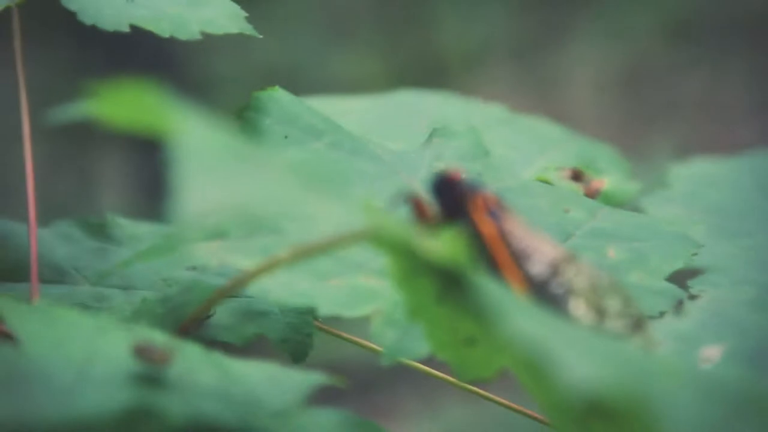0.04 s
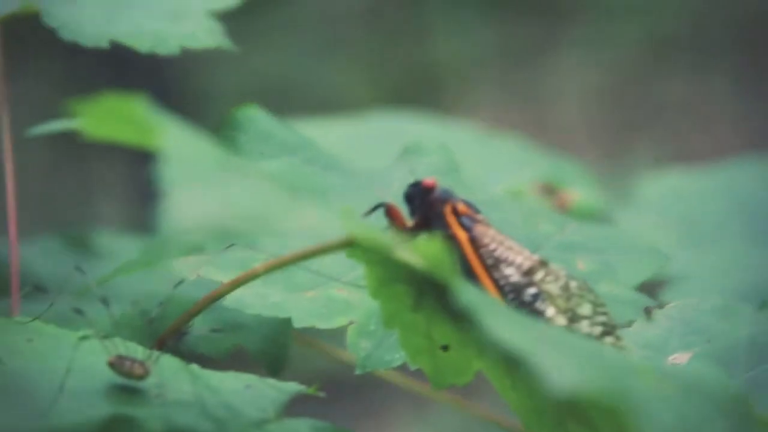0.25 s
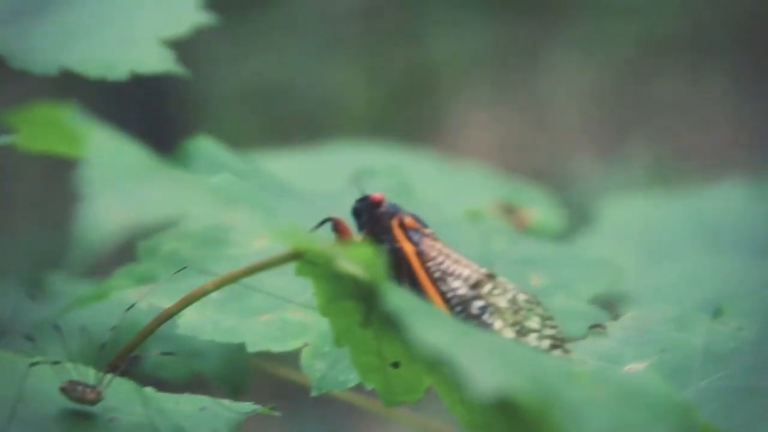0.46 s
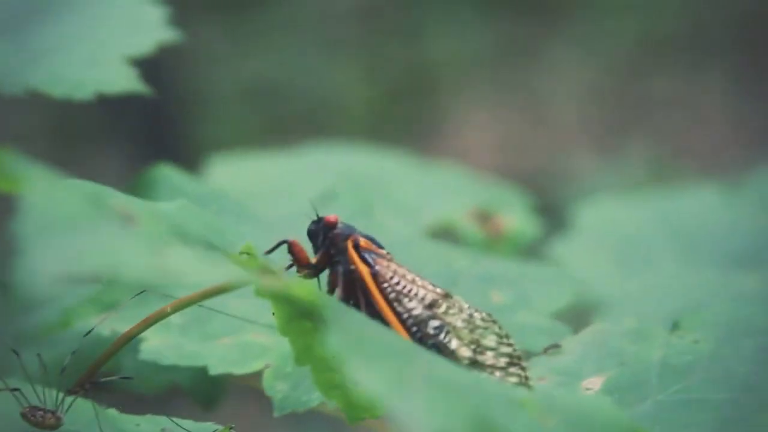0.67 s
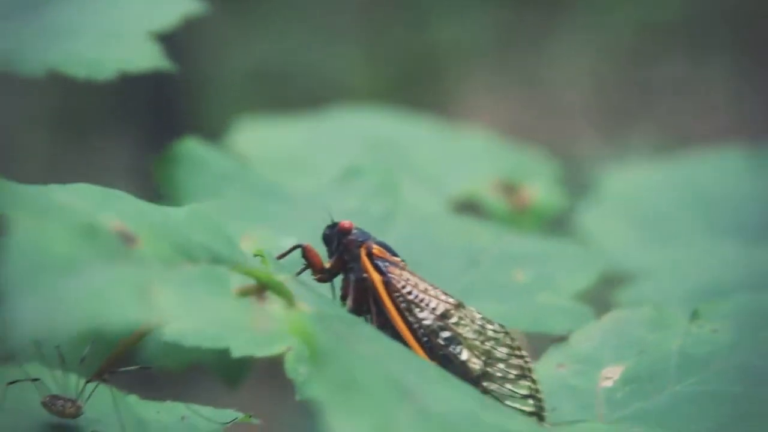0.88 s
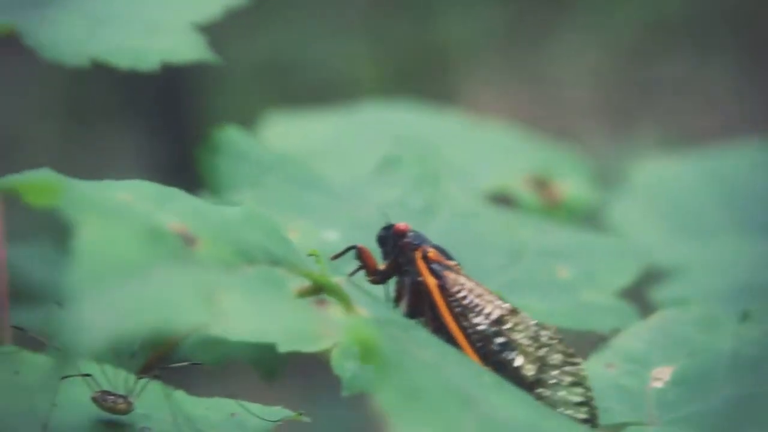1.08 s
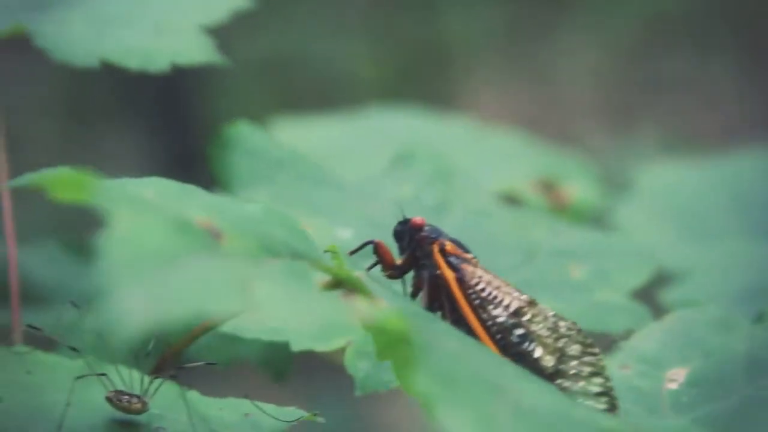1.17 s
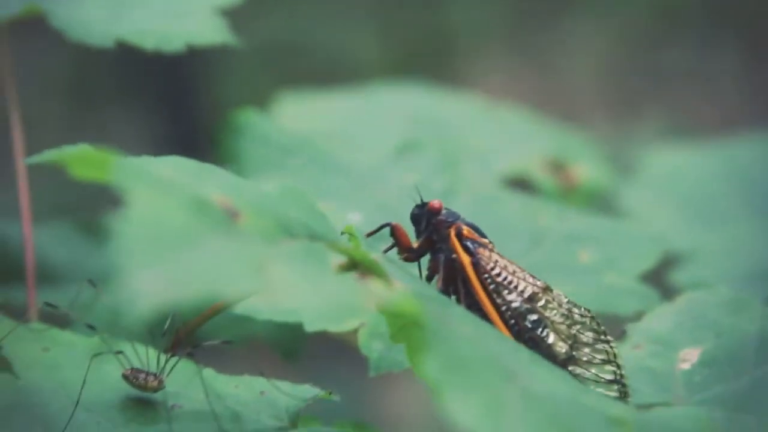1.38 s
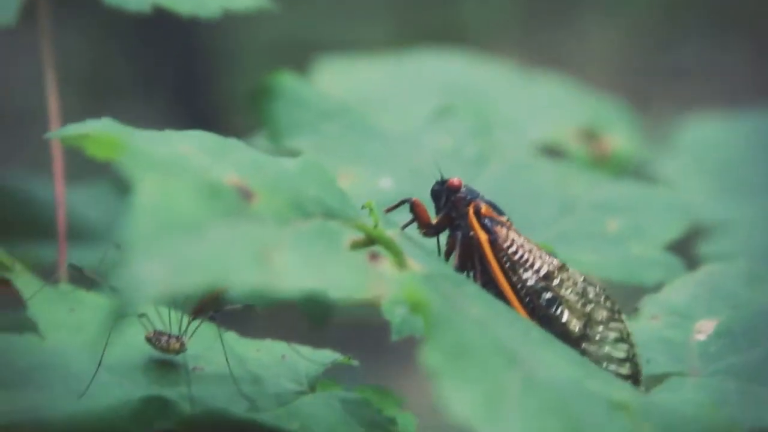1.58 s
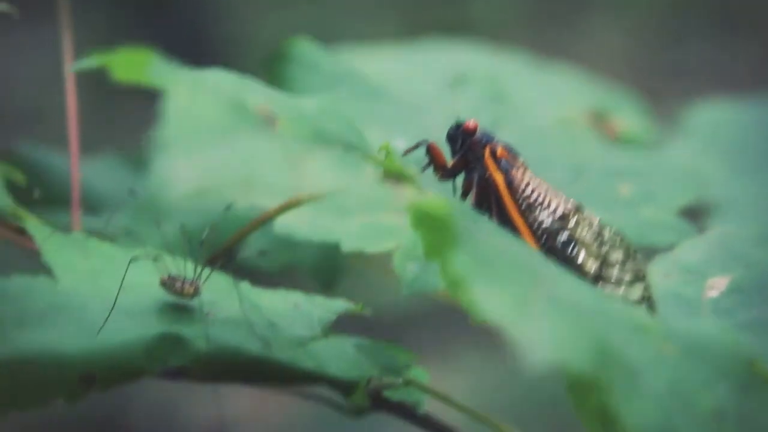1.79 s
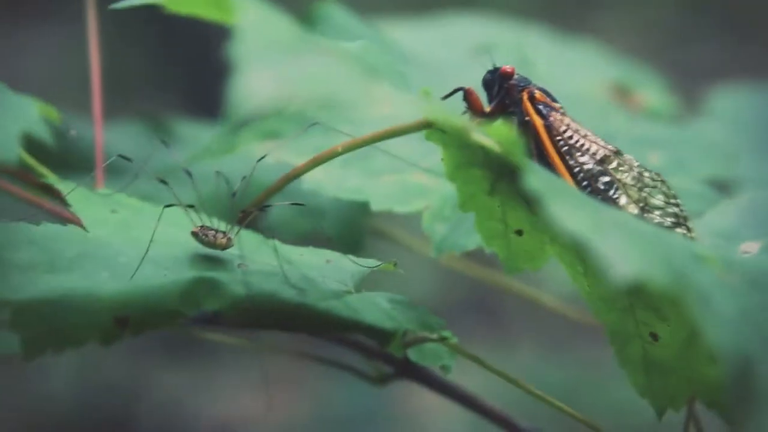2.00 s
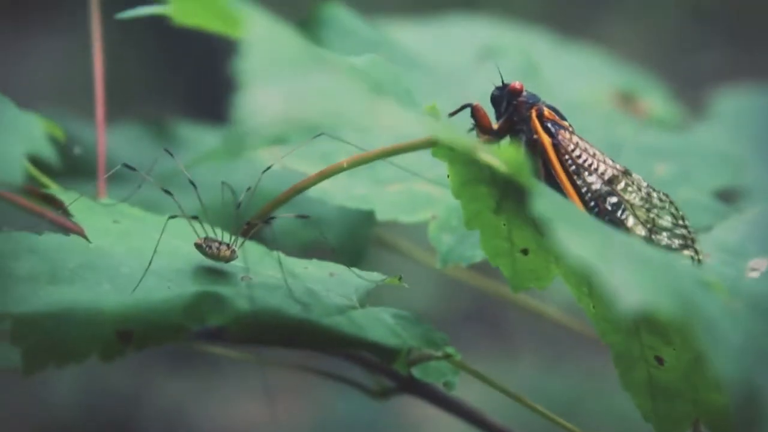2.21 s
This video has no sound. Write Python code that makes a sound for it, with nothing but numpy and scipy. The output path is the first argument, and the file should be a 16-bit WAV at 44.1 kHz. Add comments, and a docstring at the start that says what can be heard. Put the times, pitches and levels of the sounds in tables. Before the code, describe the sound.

A dense cicada chorus rings at one steady high pitch throughout, with a thin rasp and soft woodland hiss. Nearby leaves rustle lightly at the start, then tick now and then, most clearly around 0.9 and 1.4 seconds. A distant bird gives a faint falling whistle at about 0.4 seconds. A small bird adds two quiet, very high chirps with a slight echo, near 0.7 and 1.6 seconds.

```python
"""A dense drone of periodical cicadas rings near 1.3 kHz from the trees all around: many wavering voices
merge into one, with a thin rasp of tymbal clicks above. Close by, leaves rustle and tick, and a small
bird gives two very high chips that echo in the wood. A farther bird slurs one falling whistle.
Under it all lies the hiss of the air and the farthest insects."""
import sys
import numpy as np
from scipy import signal
from scipy.fft import rfft, irfft
from scipy.io import wavfile

SR = 44100
rng = np.random.default_rng(int(sys.argv[2]) if len(sys.argv) > 2 else 0)


def unload_wav(signal):
    """Save mono or channel-first audio to the path in sys.argv[1] as 16-bit WAV at rate SR, clipped to [-1, 1]."""
    wavfile.write(
        sys.argv[1],
        SR,
        np.round(np.clip(np.atleast_2d(signal).T, -1, 1) * 32767).astype(np.int16),
    )


N = 98916
T = np.arange(N) / SR


def chorus(count=130, level_db=-32):
    """Each cicada holds its own wavering, fluttering note; together they beat into a drone."""
    # voice strength by pitch: (frequency [Hz], relative level [dB])
    voice_levels = [(780, -27), (850, -19), (940, -17.5), (1060, -18.5), (1170, -8), (1235, -4),
                    (1295, 1.5), (1345, 2), (1410, -4.8), (1490, -12.5), (1580, -18), (1740, -27)]
    # slow swell of the whole chorus: (time [s], gain [dB])
    swell = [(0, 0), (.3, -0.14), (.7, -0.5), (1.0, -0.6), (1.3, 0.7), (1.55, -1), (1.9, -.4), (2.24, -0.3)]
    wander_hz, wander_rate_hz = 9, 4.001
    flutter_db, flutter_rate_hz = 2.5, 28
    surge_db, surge_rate_hz = 1.16, 6.8
    low_hz, high_hz = voice_levels[0][0], voice_levels[-1][0]
    voices = np.zeros(N)
    for k, (offset, start_cycles) in enumerate(rng.random((count, 2))):
        hz = low_hz + (high_hz - low_hz) * (k + offset) / count
        cycles = start_cycles + np.cumsum(hz + wander_hz * drift(wander_rate_hz)) / SR
        voice_db = at_hz(voice_levels, hz) + flutter_db * drift(flutter_rate_hz)
        voices += from_db(voice_db) * np.sin(2 * np.pi * cycles)
    surge = from_db(surge_db * drift(surge_rate_hz))
    return from_db(level_db) * level_curve(swell) * rms_one(voices * surge)


def tymbal_rasp(clicks_per_s=2500, flicker_db=2.07):
    """Random tymbal clicks ring the upper resonances of the cicadas' bodies."""
    # body resonances: (frequency [Hz], width [Hz], level [dB])
    bands = [(2521, 200, -57.5), (3460, 130, -66), (3863, 350, -66.5)]
    out = np.zeros(N)
    for hz, width_hz, db in bands:
        clicks = rng.standard_normal(N) * (rng.random(N) < clicks_per_s / SR)
        ring = resonate(resonate(clicks, hz, width_hz), hz, 2 * width_hz)
        out += from_db(db) * rms_one(ring)
    return out * from_db(flicker_db * drift(rate_hz=32))


def leaves(attack_s=0.00051, bump_peak_s=0.0094, flicker_db=1.0):
    """A brush through the leaves dies away; single leaves and stems go on ticking."""
    # rustle envelope: (time [s], level [dB])
    rustle = [(0, -54), (.13, -52.5), (.2, -59), (.32, -74), (.6, -85)]
    # leaf and stem ticks: (time [s], decay [s], snap [dB], paper [dB], bump [dB])
    ticks = [(.146, .008, -70, -47, -81), (0.212, .002, -49, -65, -65), (0.396, .003, -50, -62, -66),
             (.4194, .003, -57, -63, -80), (0.524, .002, -58, -64, -77), (0.688, .002, -47.5, -65, -68),
             (0.871, .004, -61, -41, -65), (1.059, 0.0097, -57, -58, -59), (1.2, .002, -52, -65, -73),
             (1.261, .005, -56, -51, -72), (1.4154, 0.0067, -54, -44.5, -65),
             (2.107, 0.0097, -52.5, -59, -54.5), (2.124, .008, -60, -53, -64)]
    # spectra of rustle, crisp snap, papery body, soft bump: (frequency [Hz], relative density [dB])
    rustle_colour = [(300, -7), (2000, -0.5), (4400, 0.5), (6500, -14.5), (9000, -9), (12500, -13),
                     (15500, -22)]
    snap_colour = [(2000, -8), (6000, -4), (9000, 0), (13000, 0), (15500, -11)]
    paper_colour = [(700, -4), (2300, -3), (4200, 10), (6500, -14), (12000, -34)]
    bump_colour = [(40, -26), (115, 5.5), (180, -14), (300, 4), (450, -15), (1200, -28)]
    out = level_curve(rustle) * noise(rustle_colour) * from_db(flicker_db * drift(rate_hz=150))
    snap, paper, bump = noise(snap_colour), noise(paper_colour), noise(bump_colour)
    for start_s, decay_s, snap_db, paper_db, bump_db in ticks:
        age_s = np.maximum(T - start_s, 0)
        tick_envelope = (1 - np.exp(-age_s / attack_s)) * np.exp(-age_s / decay_s)
        bump_envelope = age_s / bump_peak_s * np.exp(1 - age_s / bump_peak_s)
        out += tick_envelope * (from_db(snap_db) * snap + from_db(paper_db) * paper)
        out += bump_envelope * from_db(bump_db) * bump
    return out


def near_bird(length_s=0.0176, base_hz=7980, rise_hz=1290, buzz_depth_hz=544, buzz_rate_hz=180):
    """Short, high, buzzy upward chips, each followed by its echoes."""
    # chips: (time [s], level [dB], echo level [dB])
    chips = [(.741, -57, -52.5), (1.649, -52, -50.5)]
    out = np.zeros(N)
    for start_s, db, echo_db in chips:
        progress = np.clip((T - start_s) / length_s, 0, 1)
        buzz_hz = progress * buzz_depth_hz * np.sin(2 * np.pi * buzz_rate_hz * (T - start_s))
        chip = note(start_s, length_s, base_hz + rise_hz * progress ** 2 + buzz_hz)
        out += from_db(db) * chip + from_db(echo_db) * wood_echo(chip)
    return out


def far_bird(echo_db=-6):
    """One faint whistled phrase: a small lift, then a downward slur."""
    # glides: (time [s], length [s], from [Hz], to [Hz], level [dB])
    glides = [(.305, 0.031, 3000, 3145, -58), (0.418, 0.07, 3710, 2767, -55),
              (0.472, 0.031, 2453, 2180, -60)]
    out = np.zeros(N)
    for start_s, length_s, from_hz, to_hz, db in glides:
        hz = np.interp(T, [start_s, start_s + length_s], [from_hz, to_hz])
        out += from_db(db) * note(start_s, length_s, hz)
    return out + from_db(echo_db) * wood_echo(out)


def wood_echo(x, t60_s=0.66, delay_s=0.0073, echoes_per_s=1700):
    """Dying echoes scattered by trunks and foliage; the response has unit energy."""
    t = T[:SR]
    echoes = rng.standard_normal(SR) * (rng.random(SR) < echoes_per_s / SR)
    echoes *= (t > delay_s) * np.exp(-np.log(1000) * t / t60_s)
    return signal.fftconvolve(x, echoes / np.linalg.norm(echoes))[:N]


def air(level_db=-51, flicker_db=0.5):
    """Even hiss of the farthest insects and the air of the wood."""
    # hiss spectrum: (frequency [Hz], relative density [dB])
    colour = [(15, -32), (28, -21), (60, -10), (112, -2), (150, -6), (300, -.5), (420, -0.5), (650, 3.5),
              (1000, 4.5), (1900, 4.5), (2900, -2), (4200, -4.5), (5500, -9), (7300, -13.5), (10500, -14),
              (12800, -18.5), (15500, -27)]
    return from_db(level_db + flicker_db * drift(rate_hz=27)) * noise(colour)


def note(start_s, length_s, hz):
    """Whistled tone that swells and fades in one arch."""
    arch = np.sin(np.pi * np.clip((T - start_s) / length_s, 0, 1))
    return np.sqrt(2) * arch * np.sin(2 * np.pi * np.cumsum(hz) / SR)


def resonate(x, hz, width_hz):
    """Two-pole resonance."""
    r = np.exp(-np.pi * width_hz / SR)
    return signal.lfilter([1, 0, -1], [1, -2 * r * np.cos(2 * np.pi * hz / SR), r * r], x)


def noise(colour):
    """Unit-power noise with the given spectrum."""
    gain = from_db(at_hz(colour, np.fft.rfftfreq(N, 1 / SR)))
    return rms_one(irfft(rfft(rng.standard_normal(N)) * gain, N))


def drift(rate_hz):
    """Smooth random motion of unit RMS, low-passed at rate_hz."""
    hop, settle_steps = 40, 2000
    r = np.exp(-2 * np.pi * rate_hz * hop / SR)
    white = rng.standard_normal(N // hop + settle_steps + 2)
    slow = signal.lfilter([1], [1, -2 * r, r * r], white)[settle_steps:]
    return np.interp(np.arange(N) / hop, np.arange(len(slow)), rms_one(slow))


def level_curve(points):
    """Gain along (time [s], level [dB]) points."""
    return from_db(np.interp(T, *np.transpose(points)))


def at_hz(points, hz):
    """Read (frequency [Hz], level [dB]) points on a log-frequency axis."""
    points_hz, db = np.transpose(points)
    return np.interp(np.log(hz + 1e-3), np.log(points_hz), db)


def from_db(db):
    """Decibels to gain."""
    return 10 ** (np.asarray(db) / 20)


def rms_one(x):
    """Scale to unit power."""
    return x / np.sqrt(np.mean(x ** 2) + 1e-20)


def scene():
    """All sources sum to mono at one spot among the leaves."""
    return (chorus() + tymbal_rasp() + air() + leaves() + near_bird() + far_bird())[None]


def record(dry, cutoff_hz=15700):
    """Steep low-pass on the top treble."""
    return signal.sosfilt(signal.ellip(12, .1, 80, cutoff_hz, fs=SR, output="sos"), dry)


dry = scene()
out = record(dry)
unload_wav(out)
```